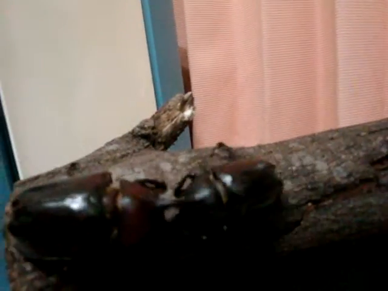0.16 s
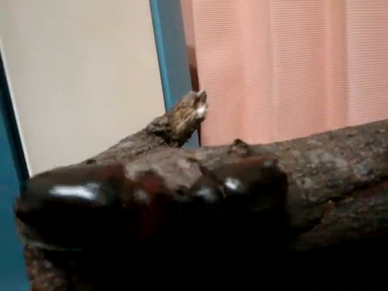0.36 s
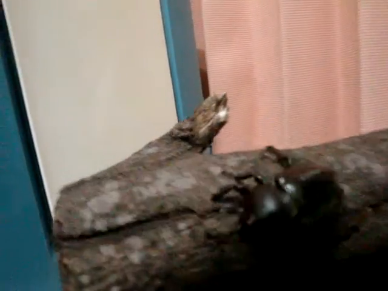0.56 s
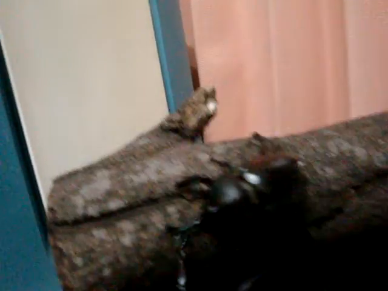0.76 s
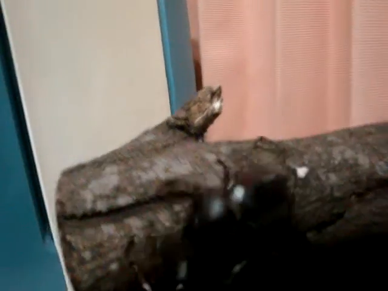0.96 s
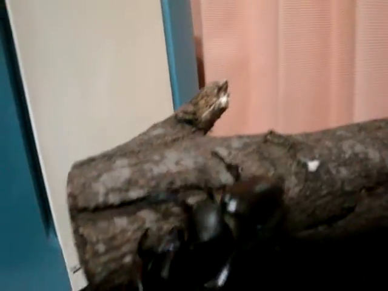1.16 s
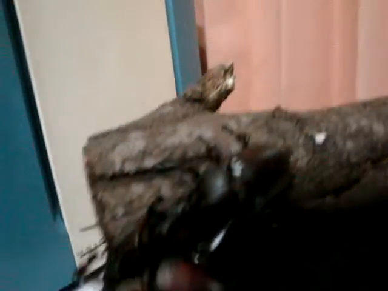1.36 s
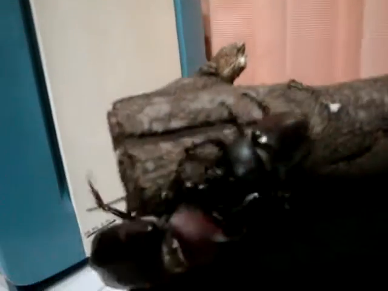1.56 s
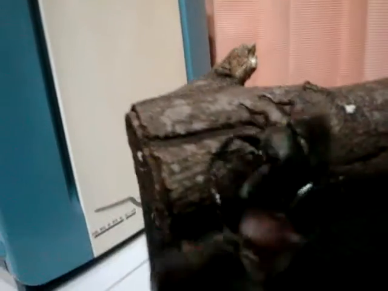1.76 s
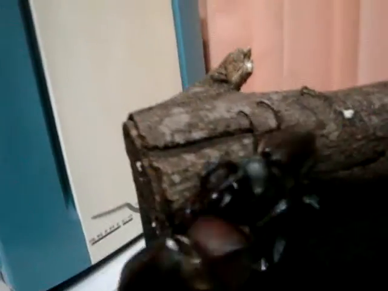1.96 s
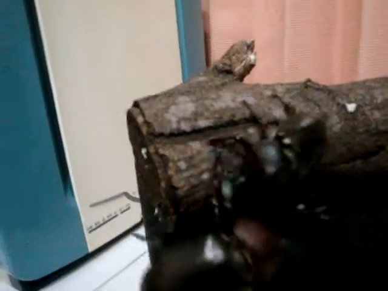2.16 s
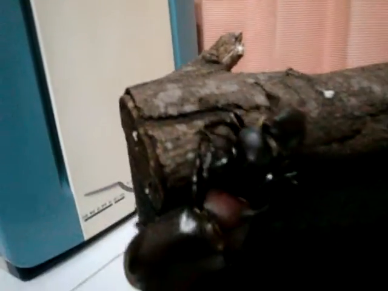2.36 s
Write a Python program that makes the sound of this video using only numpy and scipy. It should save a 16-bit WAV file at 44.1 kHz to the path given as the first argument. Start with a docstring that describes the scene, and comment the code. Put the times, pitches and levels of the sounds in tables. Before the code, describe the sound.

Two large beetles grapple on a log, claws snapping and scraping gritty bark over soft hiss

```python
"""Two beetles grappling on a log

Two large beetles grapple in a quiet room. Their claws snap on the bark and drag across it in gritty
strokes, each built from many tiny rings of bark flakes. Early on, a few dull knocks ring the log;
later a claw twice skids with a zipping rasp, a fast train of clicks. Small steps, steady hiss,
a faint hum, a little room echo and the soft rub of a hand on the camera lie underneath."""
import sys
import numpy as np
from scipy import signal
from scipy.fft import rfft, irfft
from scipy.io import wavfile
from scipy.ndimage import uniform_filter1d

SR = 44100
rng = np.random.default_rng(int(sys.argv[2]) if len(sys.argv) > 2 else 0)


def dump_mix(stems):
    """Bounce the given channels to the path in sys.argv[1] as a 16-bit WAV at rate SR."""
    frames = np.atleast_2d(stems).T  # one column per channel
    limited = np.clip(frames, -1, 1)  # hard clip at full scale
    pcm = np.round(limited * 32767).astype(np.int16)
    wavfile.write(sys.argv[1], SR, pcm)


N = 105840  # length of the scene in samples (2.4 s)
FREQS = np.fft.rfftfreq(1024, 1 / SR)  # the frequencies at which spectra are drawn [Hz]
TEAR_S, TEAR_PEAK_S = 0.0005, 0.0023  # width of the tiny burst of a tear, and when it peaks [s]
LEAD_S = 0.0083  # how long before a snap's release its sound starts [s]


def amp(db):
    """Turns decibels into a gain."""
    return 10 ** (np.asarray(db) / 20)


def evened(x):
    """Scales a signal to an average (rms) level of 1."""
    return x / np.sqrt(np.mean(x ** 2) + 1e-20)


def read(points, hz):
    """Reads a spectrum between its points, along a log-frequency axis."""
    f, value = np.transpose(points)
    return np.interp(np.log(hz + 1), np.log(f), value)


def add(mix, s, sound):
    """Mixes a sound in at time s, cutting it where the mix ends."""
    part = mix[max(round(s * SR), 0):][:len(sound)]
    part += sound[:len(part)]


def background():
    """Steady, slightly patchy hiss: noise shaped over time and frequency, plus a faint pure hum."""
    # spectrum of the hiss: (frequency [Hz], relative level per Hz [dB])
    hiss_colour = [(20, -40), (40, -17.5), (62, 1), (85, -18), (130, -2), (200, -2.5), (300, -1.5),
                   (480, 2), (850, 4), (1400, -0.5), (2500, -3), (4200, -9.5), (6000, -27.5), (10000, -30)]
    # steady hum: (frequency [Hz], level [dB])
    hum_tones = [(118, -65.5)]
    hiss_db, patch_db = -48, 2  # overall level, and how much the patches vary
    real, imaginary, patches = rng.standard_normal((3, N // 256 + 5, len(FREQS)))
    patches = uniform_filter1d(patches, size=10, axis=0)  # smooth over time
    patches = evened(uniform_filter1d(patches, size=14, axis=1))  # smooth over frequency
    spectra = (real + 1j * imaginary) * amp(read(hiss_colour, FREQS) + patch_db * patches)
    hiss = signal.istft(spectra.T, nperseg=1024, noverlap=768)[1][:N]
    t = np.arange(N) / SR
    hum = sum(amp(db) * np.sqrt(2) * np.sin(2 * np.pi * (hz * t + rng.random()))
              for hz, db in hum_tones)
    return amp(hiss_db) * evened(hiss) + hum


def room(x):
    """The faint echo of a room: the sound smeared by a fading noise tail."""
    level_db, t60_s = -35, 0.63  # t60: time to fade by 60 dB
    t = np.arange(SR // 2) / SR
    tail = rng.standard_normal(len(t)) * amp(-60 * t / t60_s) * (t > .004)
    return amp(level_db) * signal.fftconvolve(x, tail / np.linalg.norm(tail))[:N]


def rub(start, top, end, db):
    """A hand shifts on the camera: a low, soft rustle of band-limited noise that swells and fades."""
    t = np.arange(start, end, 1 / SR)
    band = signal.butter(2, [160, 750], "bandpass", fs=SR, output="sos")  # [Hz]
    rustle = evened(signal.sosfilt(band, rng.standard_normal(N)))[:len(t)]
    return amp(db) * np.interp(t, [start, top, end], [0, 1, 0]) * rustle


def tear():
    """Fibres give way within a millisecond or two: a tiny noise burst with a nearly even spectrum."""
    t = np.arange(256) / SR
    swell = 1 / np.cosh((t - TEAR_PEAK_S) / TEAR_S)
    spectrum = rfft(rng.standard_normal(len(t)) * swell)
    flat = irfft(spectrum / (abs(spectrum) + 1e-12))
    return flat * swell ** .25


def chip(colour, hz, treble_db, body_db, focus_db, octaves, ripple_db=4.5):
    """The brief ring of one flake of bark, with a boost around hz and unit energy."""
    ripple = evened(uniform_filter1d(rng.standard_normal(len(FREQS)), size=14))
    distance = np.log2((FREQS + 1) / hz) / octaves
    db = read(colour, FREQS) + focus_db * np.exp(-.5 * distance ** 2) + ripple_db * ripple
    # two tone controls: body acts in full below 1220 Hz, treble above 6530 Hz
    db = db + np.interp(FREQS, [1220, 2190, 3940, 6530], [body_db, 0, 0, treble_db])
    # minimum phase: the ring starts at once and then dies away
    log_gain = np.log(amp(np.r_[db, db[-2:0:-1]]))
    ring = np.fft.ifft(np.exp(np.conj(signal.hilbert(log_gain)))).real
    return ring / np.linalg.norm(ring)


def grit(per_s, spread_db, hz, treble_db, body_db, length, count=10, treble_scatter_db=3):
    """Random tiny slips of uneven size, each ringing one of several flakes."""
    # colour of the grit: (frequency [Hz], level [dB])
    grit_colour = [(100, -21), (600, -11.5), (1300, -1), (2350, 2), (3000, -2), (4000, 1), (5400, -7.5),
                   (6600, -11.5), (8000, -16.5), (10000, -21.5)]
    focus_db, pitch_scatter = 7, 0.19  # strength of the ring; spread of flake pitch (natural log)
    chance = rng.random(N)[:length]
    size = rng.exponential(1, N)[:length]
    flake = rng.integers(0, count, N)[:length]
    slips = (chance < per_s / SR) * amp(spread_db * np.minimum(size, 3.5))
    rings = []
    for step in np.linspace(-1, 1, count):
        flake_hz = hz * np.exp(pitch_scatter * step)
        flake_treble_db = treble_db + treble_scatter_db * step
        ring = chip(grit_colour, flake_hz, flake_treble_db, body_db, focus_db, octaves=0.31)
        rings.append(np.convolve(tear(), ring))
    return evened(sum(signal.fftconvolve(slips * (flake == k), ring)[:length]
                      for k, ring in enumerate(rings)))


def splinters(per_s, length, count=14, spread_db=6.5):
    """Tiny splinters of bark break at random, each a very short, high ping."""
    low_hz, top_hz, peak_s = 4300, 9900, 0.00082  # pitch range; time for a ping to reach its top
    chance = rng.random(N)[:length]
    size = rng.exponential(1, N)[:length]
    which = rng.integers(0, count, N)[:length]
    breaks = (chance < per_s / SR) * amp(spread_db * np.minimum(size, 3))
    t = np.arange(SR // 150) / SR
    swell = (t / peak_s) ** 2 * np.exp(-2 * t / peak_s)
    pings = [swell * np.sin(2 * np.pi * hz * t) / hz for hz in np.linspace(low_hz, top_hz, count)]
    return evened(sum(np.convolve(breaks * (which == k), ping)[:length]
                      for k, ping in enumerate(pings)))


def footsteps():
    """Small steps all the time: sparse grit, and still fainter splinters under the feet."""
    steps = amp(-51) * grit(400, 5.5, 3500, 0, 0, N)  # 400 slips per second around 3500 Hz
    return steps + amp(-59) * splinters(700, N)


def knock(db, soft_hz):
    """A blow rings the damped modes of the log; a soft contact rings the high ones less."""
    # ringing modes of the log: (frequency [Hz], level [dB], time to fade by 60 dB [s])
    log_modes = [(94, -5.5, 0.028), (236, 1.5, 0.02), (373, -1, 0.015), (550, -1, 0.019),
                 (776, -2.5, 0.019), (1010, -3, 0.0073), (1677, 2, 0.036), (2266, 4.5, 0.025)]
    t = np.arange(SR // 8) / SR
    ringing = 0
    for k, (hz, level, t60) in enumerate(log_modes):
        strength = (-1) ** k / np.hypot(1, hz / soft_hz)
        ringing = ringing + strength * amp(level - 60 * t / t60) * np.sin(2 * np.pi * hz * t)
    return amp(db) * ringing


def skid(curve, count=400):
    """A claw catches and slips hundreds of times a second or more; each slip is one dry click."""
    # colour of one slip: (frequency [Hz], level [dB])
    slip_colour = [(100, -35), (600, -9.5), (1000, -5.5), (1500, -4), (2400, -1), (3700, -0.5),
                   (5400, -8.5), (7000, -17.5), (10000, -27.5)]
    jitter, spread_db = 0.16, 3.5  # unevenness of slip spacing (natural log) and of slip size
    slip_hz, focus_db = 2870, 3
    bright_per_s, bright_db = 2830, 8  # quick slips carry more treble: in full at this rate
    s, per_s, db = np.transpose(curve)
    t = np.arange(s[0], s[-1], 1 / SR)
    rate = np.interp(t, s, per_s)
    spacing, size = rng.standard_normal((2, count))
    # a slip happens each time the claw's travel reaches the next ridge
    ridges, travel = np.cumsum(np.exp(jitter * spacing)), np.cumsum(rate) / SR
    at = np.searchsorted(travel, ridges[ridges < travel[-1]])
    slips = np.zeros(len(t))
    slip_size = evened(amp(spread_db * size))[:len(at)]
    crowding = np.sqrt(SR / rate[at])  # keeps the level from depending on the rate
    slips[at] = slip_size * crowding * amp(np.interp(t[at], s, db))
    quick = np.clip(rate / bright_per_s, 0, 1) ** 2
    dull, bright = (chip(slip_colour, slip_hz, treble, 0, focus_db, octaves=0.19, ripple_db=2.5)
                    for treble in (0, bright_db))
    return signal.fftconvolve(slips * (1 - quick), dull) + signal.fftconvolve(slips * quick, bright)


def scrape(start, top, end, db, hz, treble_db, body_db):
    """A claw bears down, drags over the bark gripping and sliding unevenly, and eases off."""
    stick_db, stick_s = 8, 0.00497  # how far the grip varies up and down, and how often it changes
    rise_db, fall_db, curve = 11.5, 11, 0.88  # drop at start and end; roundness of the top
    t = np.arange(start, max(end, start + .01), 1 / SR)
    away = abs(np.interp(t, [start, top, end], [1, 0, 1])) ** curve
    grips = rng.uniform(-1, 1, size=200)
    stick = stick_db * np.interp((t - start) / stick_s, np.arange(len(grips)), grips)
    pressure = amp(db + stick - away * np.where(t < top, rise_db, fall_db))
    pressure = pressure * signal.windows.tukey(len(t), .1)  # soft ends
    rasp = grit(2000, 3, hz, treble_db, body_db, len(t))  # 2000 grains per second
    crackle = amp(-9.5 + treble_db) * splinters(550, len(t))
    return pressure * (rasp + crackle)


def snap(db, hz, treble_db):
    """Strain builds with a faint crackle, the claw lets go, and a few crumbs follow."""
    # colour of a snap: (frequency [Hz], level [dB])
    snap_colour = [(100, -35.5), (700, -19.5), (1400, -13.5), (2150, -1.5), (3000, -6), (4000, -0.5),
                   (5300, -4.5), (6600, -7), (8000, -14), (10000, -14)]
    crumble_db, strain_s, crumble_s = -7, 0.0009, 0.0043  # crumb level; crackle build-up and decay
    level_span_s = 0.0029  # the level holds for the energy spread over this time
    t = np.arange(-round(LEAD_S * SR), SR // 50) / SR  # release at t = 0
    crumbs = rng.standard_normal(len(t)) * np.exp(-abs(t) / np.where(t < 0, strain_s, crumble_s))
    release = t == 0
    force = np.convolve(tear(), release + amp(crumble_db) * crumbs / np.linalg.norm(crumbs))
    ring = chip(snap_colour, hz, treble_db, 0, focus_db=11, octaves=0.32)
    sound = signal.fftconvolve(force, ring)
    return amp(db) * np.sqrt(level_span_s * SR) * sound / np.linalg.norm(sound)


def scene():
    """Both beetles on the log, with the room, the hand and the hiss."""
    # a hand rubs: (start [s], strongest [s], end [s], level [dB])
    rubs = [(1.979, 2.11, 2.34, -50.5)]
    # dull knocks through the log: (time [s], level [dB], above this a soft contact rings less [Hz])
    knocks = [(.3808, -30, 800), (0.3995, -35, 900), (.4142, -26.5, 500), (.4445, -31.5, 900),
              (.4836, -22.5, 4950), (.4915, -37, 400)]
    # a claw skids, one list per skid: (time [s], slip rate [slips per s], level [dB])
    skids = [
        [(1.644, 374, -41), (1.656, 840, -42), (1.662, 1270, -25), (1.672, 2560, -24.5), (1.681, 2330, -22.5),
         (1.693, 1910, -25.5), (1.704, 720, -36.5), (1.711, 560, -30.5), (1.721, 330, -46)],
        [(1.915, 354, -44), (1.952, 620, -42.5), (1.967, 1460, -35.5), (1.983, 670, -36), (1.996, 397, -47.5),
         (2.012, 400, -41), (2.036, 770, -35), (2.046, 1450, -26), (2.055, 1130, -34), (2.064, 1720, -29.5),
         (2.072, 1410, -31.5), (2.079, 1620, -28), (2.093, 890, -42.5)],
    ]
    # claws drag over bark:
    # (start [s], strongest [s], end [s], level [dB], pitch [Hz], treble [dB], body [dB])
    scrapes = [(0.12,0.117,.15,-41.5,1450,3,6), (0.185,.215,0.25,-36.5,2980,-2.5,-19),
               (0.253,0.305,.33,-35,2330,-21,-13), (0.329,0.357,0.38,-32.5,2680,-26,-1),
               (0.366,0.392,0.411,-31,1480,-12,9), (.411,0.45,.466,-26,3030,-0.5,4.5),
               (0.462,0.467,.54,-33,4300,2,2), (0.541,0.559,0.6,-34,3730,3.5,-12),
               (0.597,.653,0.68,-39,2400,-1.5,4.5), (0.687,0.707,0.73,-39.5,3270,-4,-5),
               (0.968,0.981,1.071,-44,2900,6,7.5), (1.058,1.107,1.167,-38,3940,1.5,2),
               (1.26,1.316,1.36,-40.5,3830,1.5,-6.5), (1.503,1.533,1.59,-45.5,3680,-4,3),
               (2.107,2.115,2.103,-28.5,4000,6,-6), (2.149,2.16,2.37,-47,4300,4.5,-10)]
    # a claw or shell catches and lets go: (time [s], level [dB], ringing pitch [Hz], treble [dB])
    snaps = [(0.1208,-38,2840,3), (.26,-25,3650,2.5), (0.2719,-22,2540,-6), (0.293,-20.5,2370,-11),
             (0.297,-21.5,2600,1), (0.3013,-18.5,3250,5), (0.3107,-19,3270,-1), (0.3169,-25.5,2820,-15),
             (0.3341,-23,4040,9), (.372,-24,3600,-13), (0.3767,-21.5,4700,11), (0.38,-17.5,3700,5),
             (0.3914,-23,4700,-7), (0.3996,-15,4500,1), (0.4035,-21,4300,1), (0.4057,-22.5,3250,-0.5),
             (0.4234,-23,2400,7), (0.4421,-22,4120,1), (.476,-26.5,3750,12), (.4846,-21,3400,6),
             (0.5578,-32,3870,11), (0.6127,-29.5,2220,-16), (.6322,-31,2880,-2), (0.6513,-32,3500,4.5),
             (0.7996,-33,2940,-1), (0.8205,-33,2330,-4), (1.073,-31.5,4200,14), (1.183,-35.5,2650,-3),
             (1.2554,-32.5,3500,0.5), (1.2786,-33.5,4840,12), (1.3707,-32,4070,-1), (1.5138,-35.5,4000,6),
             (1.638,-32.5,3900,4), (1.65,-26,2630,-13), (1.671,-19.5,3480,-1), (1.87,-34,2700,2),
             (2.061,-19.5,3460,-4.5), (2.0962,-29,4450,2), (2.1014,-27,4670,-2)]
    hand = np.zeros(N)
    for row in rubs:
        add(hand, row[0], rub(*row))
    beetles = footsteps()
    for s, *row in knocks:
        add(beetles, s, knock(*row))
    for curve in skids:
        add(beetles, curve[0][0], skid(curve))
    for row in scrapes:
        add(beetles, row[0], scrape(*row))
    for s, *row in snaps:
        # start early, so that the release falls close to time s
        add(beetles, s - LEAD_S - TEAR_PEAK_S + TEAR_S, snap(*row))
    return (beetles + room(beetles) + hand + background())[None]


def record(dry):
    """A steep filter removes the highest treble, above about 10 kHz."""
    low_pass = signal.firwin(601, 10050, window=("kaiser", 8), fs=SR)
    return signal.oaconvolve(dry, low_pass[None], "same")


dry = scene()
out = record(dry)
dump_mix(out)
```